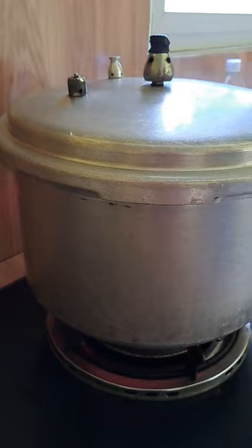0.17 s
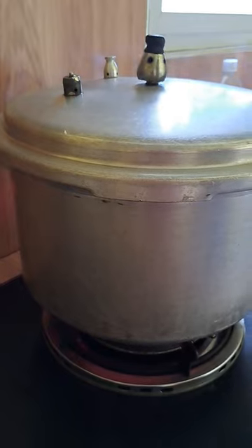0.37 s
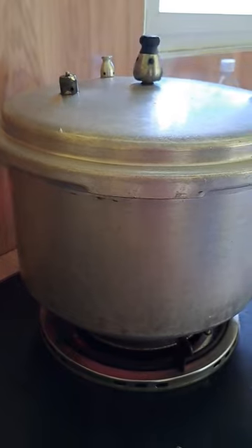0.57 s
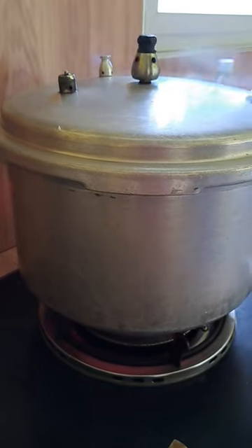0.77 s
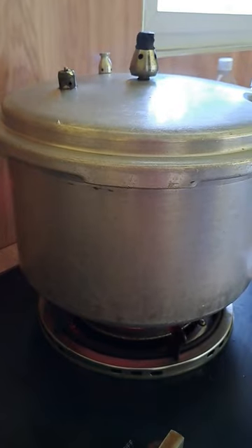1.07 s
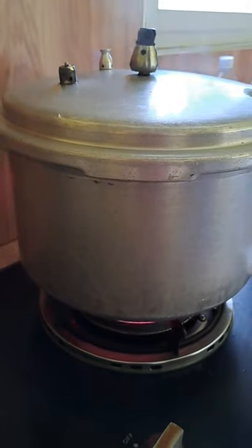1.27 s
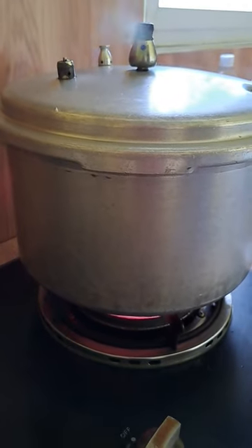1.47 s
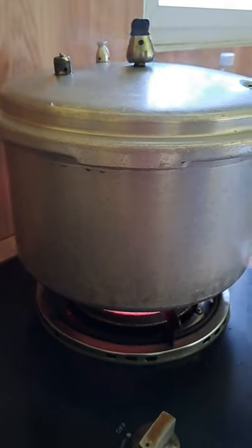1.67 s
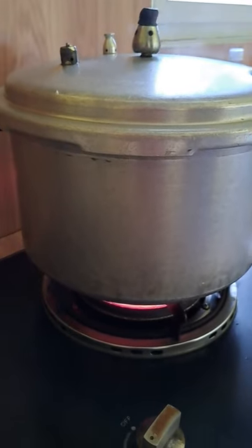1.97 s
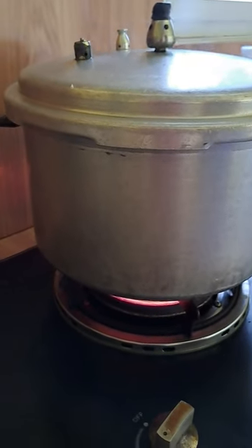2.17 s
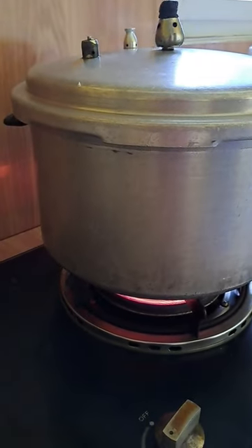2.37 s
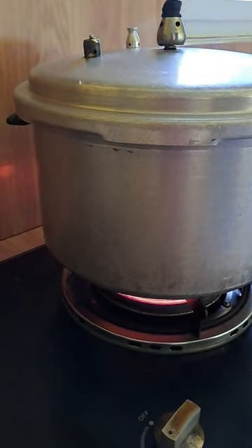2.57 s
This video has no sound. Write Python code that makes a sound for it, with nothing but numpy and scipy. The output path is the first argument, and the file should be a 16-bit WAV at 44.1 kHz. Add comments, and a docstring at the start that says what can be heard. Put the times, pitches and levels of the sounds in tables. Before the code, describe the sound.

Steam hisses loudly and continuously from a pressure cooker's rocking weight, surging in fast irregular pulses with fine spray and short spurts, over a very faint stove hum, heard close in stereo in a small kitchen.

```python
"""A pressure cooker vents on a gas ring in a small kitchen.
From the start, turbulent noise with a fine spray of droplets surges in bright hiss past the rocking weight.
Lid and walls scatter the swinging jets, resonant noise rings the lid, and the stove hums faintly below.
Soon short spurts of noise, about four a second, ring the two resonances of the vent."""
import sys
import numpy as np
from scipy import signal
from scipy.fft import rfft, irfft, next_fast_len
from scipy.io import wavfile

SR = 44100
rng = np.random.default_rng(int(sys.argv[2]) if len(sys.argv) > 2 else 0)


def file_out(sig):
    """Save sig as 16-bit WAV at sys.argv[1]."""
    # one column per channel
    cols = np.atleast_2d(sig).T
    # limit, then scale
    lim = np.clip(cols, -1, 1)
    pcm = np.round(lim * 32767).astype(np.int16)
    wavfile.write(sys.argv[1], SR, pcm)


N = 120393

# Steam flow past the rocking weight, before each register scales its swings: start_s, level_db
STEAM_FLOW = [(0.0, -21.5), (0.06, -23), (0.09, -26), (0.21, -23.5), (0.27, -21.5), (0.315, -22),
              (0.36, -21), (0.48, -25.5), (0.51, -21.5), (0.555, -19.5), (0.585, -19), (0.618, -19),
              (0.705, -26), (0.735, -25), (0.765, -17.5), (0.84, -22.5), (0.885, -20), (0.915, -23),
              (0.96, -22.5), (0.99, -25), (1.005, -27), (1.035, -24.5), (1.095, -17), (1.125, -23.5),
              (1.19, -22.3), (1.23, -28.8), (1.26, -28), (1.33, -17.5), (1.355, -17.5), (1.395, -25),
              (1.44, -22.5), (1.5, -28), (1.575, -20.5), (1.65, -22.5), (1.725, -27.5), (1.785, -20),
              (1.83, -20.5), (1.86, -21), (1.875, -20.5), (1.935, -28), (1.965, -27), (2.025, -19),
              (2.055, -17), (2.1, -25), (2.115, -26.5), (2.16, -21.5), (2.22, -25), (2.265, -23.5),
              (2.28, -19), (2.32, -21.5), (2.365, -19.5), (2.43, -29.5), (2.49, -20), (2.535, -17.5),
              (2.565, -21), (2.595, -20), (2.67, -26.5), (2.725, -24.5)]
# Low rush against the hiss; only departures from its mean count, in part: start_s, level_db
LOW_RUSH = [(0.0, 1), (0.09, 1.5), (0.18, -2), (0.39, 1.5), (0.525, -2.5), (0.57, 4), (0.705, -0.3),
            (0.78, -4.5), (0.84, 0.6), (1.11, -3.5), (1.125, 4.5), (1.2, -0.5), (1.71, -3), (1.755, -3),
            (1.935, 1), (1.98, -5), (2.07, -4), (2.1, 1), (2.145, -3), (2.46, -2.9), (2.53, -2.2),
            (2.61, 1.5), (2.725, -3.5)]
# Colour of the jets, shape only: frequency_hz, density_db (relative, per Hz)
JET_COLOUR = [(300, -20), (700, -24), (1050, -19), (1500, -18), (2000, -15), (2650, -11.5), (3200, -8.5),
              (3650, -9), (4500, -5), (6200, -3.5), (7000, -0.3), (7800, 2.5), (8500, -0.9), (9600, -5.5),
              (11300, -3), (12300, 1.1), (13300, 0), (15400, -0.7)]
# How strongly each register follows the flow: frequency_hz, follow_db_per_db
FLOW_RESPONSE = [(500, 0.9), (2000, 0.64), (4500, 1.12), (7800, 0.78), (10000, 1.42), (14000, 0.87)]
# Stereo tilt of the steam: frequency_hz, left_minus_right_db
STEREO_BALANCE = [(1000, 0), (3200, -0.6), (5600, -2), (7000, -1), (8000, -1.5), (9400, 5), (10300, 6),
                  (12300, 9), (13300, -7.5), (14500, 10)]
# Swing of the jets as the weight turns, about its mean: start_s, left_minus_right_db
JET_SWING = [(0.0, 3), (0.105, 1.5), (0.225, 3.5), (0.45, 1), (0.51, 3.5), (0.705, 0.5), (0.75, 2.5),
             (1.395, 1.5), (1.71, 2), (1.74, 3.5), (1.905, 0), (2.01, 4), (2.1, 1), (2.25, 3.8), (2.43, 1),
             (2.46, 3), (2.565, 0.1), (2.725, 3)]
# Direct sound over scattered sound: frequency_hz, ratio_db
DIRECT_RATIO = [(400, -2), (1600, 2), (2000, -15), (2550, 5), (3200, -3), (4400, -5.5), (7400, -3.5),
                (12000, -14)]
# Ringing of the lid: pitch_hz, half_width_hz, level_db (against the hiss)
LID_RINGS = [(2862, 9.9, -30), (5950, 18, -44), (7000, 28, -21)]
# Flame noise of the burner, shape only: frequency_hz, density_db (relative, per Hz)
FLAME_COLOUR = [(20, -3), (55, 2), (80, -2), (120, -2), (220, 6.5), (330, -2.5), (450, 3), (650, -8.5),
                (1500, 0.5), (4000, -31)]
# Low drone of the burner: pitch_hz, half_width_hz, level_db (rms)
BURNER_DRONE = [(118, 9.1, -69), (179.2, 1.6, -72.5), (229, 6, -64.5), (296, 6.6, -72.5),
                (364.7, 2.9, -70.5)]
# Tones of the stove: pitch_hz, level_db (rms before waver), waver_db (signed spread)
STOVE_HUM = [(152, -63, 1.4), (207, -72, 2.5), (213.3, -65.5, 2), (472.7, -66.5, -0.1)]
# Low and high resonance of the vent: pitch_hz, half_width_hz
VENT_RESONANCES = [(3400, 560), (7700, 970)]
# Spurts as the weight lifts: peak_s, low_ring_db, high_ring_db
WEIGHT_SPURTS = [(0.367, -47, -30), (0.555, -47, -22.5), (0.612, -36, -22), (1.09, -43, -26),
                 (1.334, -40, -21), (1.582, -38, -31), (1.815, -35.5, -30), (2.048, -39, -20),
                 (2.29, -42, -27), (2.53, -33, -31)]

CUTOFF_HZ = 15500
# Steam: _DB is a level or the spread of a drift, _HZ how fast it drifts
HISS_DB, FLUTTER_DB, FLUTTER_HZ, PATCHY_DB, PATCHY_HZ = -0.55, 0.09, 60, 1.1, 10
SPUTTER_DB, SPUTTER_HZ = 2.27, 28  # wet steam makes the low rush uneven
RUSH_BELOW_HZ, RUSH_SHARE = 4800, 0.91
SPRAY_PER_S, SPRAY_DB, SPRAY_SPREAD_DB = 510, -10, 3.5
# Space around the jets
RIGHT_LAG_S, SCATTER_T60_S, SPOT_OVERLAP = 0.0002077, 0.078, 0.77
WALL_ECHO_S, WALL_ECHO_DB = 0.001237, -19  # heard on the left
BLUR_SHARE, BLUR_ABOVE_HZ = 0.64, 6900
ROOM_DB, ROOM_T60_S = -12.5, 0.2
# Stove: side levels are relative to the middle
FLAME_DB, FLAME_SIDE_DB, DRONE_SIDE_DB = -58.5, -5.5, -25
FLAME_FLICKER_DB, FLAME_FLICKER_HZ = 1.5, 8.1
HUM_WAVER_RAD, HUM_WAVER_HZ = 0.11, 6.3
SPURT_S = 0.018  # from peak to 1/e


def from_db(db):
    """Decibels to gain."""
    return 10 ** (np.asarray(db) / 20)


def rms_one(x):
    """Scale to unit power."""
    return x / np.sqrt(np.mean(x ** 2) + 1e-20)


def in_time(rows):
    """Draw the last column of a curve at every sample."""
    rows = np.array(rows)
    return np.interp(np.arange(N) / SR, rows[:, 0], rows[:, -1])


def at_hz(points, hz):
    """Read a table on a log-frequency axis."""
    points = np.array(points)
    return np.interp(np.log(hz + 1e-6), np.log(points[:, 0]), points[:, 1])


def filtered(x, response):
    """Apply a gain given as a function of frequency."""
    size = next_fast_len(N + SR // 4)
    hz = np.arange(size // 2 + 1) * SR / size
    return irfft(rfft(x, size) * response(hz), size)[..., :N]


def drift(hz):
    """Slow random movement with spread 1."""
    return rms_one(filtered(rng.standard_normal(N), lambda f: 1 / (1 + (f / hz) ** 2)))


def resonant_noise(hz, half_width_hz):
    """Two unrelated noises shaped by one resonance."""
    noise = rng.standard_normal((2, N))
    return rms_one(filtered(noise, lambda f: 1 / (1 + ((f - hz) / half_width_hz) ** 2)))


def jet():
    """Turbulence as white noise, with droplets as random clicks of uneven size and sign."""
    size_db = SPRAY_SPREAD_DB * np.minimum(rng.exponential(1, N), 5)
    droplets = from_db(size_db) * rng.choice([-1, 1], N)
    spray = rms_one(droplets * (rng.random(N) < SPRAY_PER_S / SR))
    return rng.standard_normal(N) + from_db(SPRAY_DB) * spray


def echoes(x, t60):
    """Dense dying reflections, different at each ear, with unit power gain."""
    t = np.arange(SR // 8) / SR
    tail = rng.standard_normal((2, len(t))) * from_db(-60 * t / t60)
    tail /= np.sqrt(np.sum(tail ** 2, axis=1, keepdims=True))
    return signal.fftconvolve(np.atleast_2d(x), tail, axes=1)[:, :N]


def blurred(pair):
    """Swirling steam washes the fine colour out of the treble: fresh noise replaces part of it."""
    def share(f):
        return BLUR_SHARE * f ** 4 / (f ** 4 + BLUR_ABOVE_HZ ** 4)

    wash = filtered(rng.standard_normal((2, N)), lambda f: np.sqrt(share(f)))
    return wash + filtered(pair, lambda f: np.sqrt(1 - share(f)))


def moving_jets(count=11):
    """Jets heard directly, off the wall and scattered by lid and stove; the scatter changes slowly over time."""
    # Crossfade, at constant power, through spots that each have their own jet and echoes
    place = np.linspace(0, count - 1, N)
    weights = np.array([np.exp(-((place - spot) / SPOT_OVERLAP) ** 2) for spot in range(count)])
    weights /= np.sqrt(np.sum(weights ** 2, axis=0))
    scattered = blurred(sum(weight * echoes(jet(), SCATTER_T60_S) for weight in weights))

    def late(f, seconds):
        return np.exp(-2j * np.pi * f * seconds)

    def direct_paths(f):
        left = 1 + from_db(WALL_ECHO_DB) * late(f, WALL_ECHO_S)
        right = late(f, RIGHT_LAG_S)
        return from_db(at_hz(DIRECT_RATIO, f)) * np.array([left, right])

    direct = filtered(jet(), direct_paths)
    # Level out the power that the direct share adds
    return filtered(direct + scattered, lambda f: 1 / np.hypot(1, from_db(at_hz(DIRECT_RATIO, f))))


def lingering(gain):
    """Level of the room's wash, whose power fills up and dies away behind the source."""
    keep = from_db(-120 / (ROOM_T60_S * SR))  # power kept per sample
    power, _ = signal.lfilter([1 - keep], [1, -keep], gain ** 2, zi=[gain[0] ** 2])
    return np.sqrt(power)


def hiss(surge_db):
    """Jets and room wash in overlapping bands; each swells with the flow and flickers a little by itself."""
    def colour(f):
        low_cut = f ** 2 / (f ** 2 + 300 ** 2)
        return from_db(at_hz(JET_COLOUR, f)) * (f < CUTOFF_HZ) * low_cut

    jets = rms_one(filtered(moving_jets(), colour))
    diffuse = rms_one(filtered(rng.standard_normal((2, N)), colour))
    rush_db = in_time(LOW_RUSH)
    rush_db = rush_db - rush_db.mean()
    out = 0
    centres = np.geomspace(500, 14500, num=12)
    for hz, share in zip(centres, np.eye(len(centres))):
        # Triangular band: full at its own centre, silent at the others
        band = np.c_[centres, share]
        near, far = filtered(np.array([jets, diffuse]), lambda f: at_hz(band, f))
        low = 1 / (1 + (hz / RUSH_BELOW_HZ) ** 4)
        level_db = at_hz(FLOW_RESPONSE, hz) * surge_db + RUSH_SHARE * low * rush_db
        gain = from_db(level_db + PATCHY_DB * drift(PATCHY_HZ))
        sputter = from_db(SPUTTER_DB * low * drift(SPUTTER_HZ))
        out = out + near * gain * sputter + far * from_db(ROOM_DB) * lingering(gain)
    return out


def lid(surge_db):
    """The jets keep the lid ringing faintly: narrow noise bands that swell with the flow."""
    rings = sum(from_db(db) * resonant_noise(hz, width) for hz, width, db in LID_RINGS)
    return from_db(surge_db) * rings


def widen(pair, side_db):
    """Mid and side to left and right."""
    return pair[0] + from_db(side_db) * pair[1] * np.array([[1], [-1]])


def stove():
    """Soft flickering flame noise, a low drone of resonant noise and a hum of wavering sines."""
    t = np.arange(N) / SR
    flame = rms_one(filtered(rng.standard_normal((2, N)), lambda f: from_db(at_hz(FLAME_COLOUR, f))))
    flame = flame * from_db(FLAME_DB + FLAME_FLICKER_DB * drift(FLAME_FLICKER_HZ))
    drone = sum(from_db(db) * resonant_noise(hz, width) for hz, width, db in BURNER_DRONE)
    hum = 0
    for hz, db, waver_db in STOVE_HUM:
        level = from_db(db + waver_db * drift(HUM_WAVER_HZ)) * np.sqrt(2)  # rms to peak
        phase = 2 * np.pi * hz * t + HUM_WAVER_RAD * drift(HUM_WAVER_HZ)
        hum = hum + level * np.sin(phase)
    return widen(flame, FLAME_SIDE_DB) + widen(drone, DRONE_SIDE_DB) + hum


def vent():
    """Each lift of the weight lets out a short spurt that rings the hollow of the valve."""
    t = np.arange(N) / SR
    peaks_s, *levels_db = np.transpose(WEIGHT_SPURTS)
    shapes = np.exp(-((t - peaks_s[:, None]) / SPURT_S) ** 2)
    out = 0
    for (hz, width), db in zip(VENT_RESONANCES, levels_db):
        out = out + from_db(db) @ shapes * resonant_noise(hz, width)
    return out


def scene():
    """Steam in the kitchen, swinging left and right, over the stove."""
    flow_db, swing_db = in_time(STEAM_FLOW), in_time(JET_SWING)
    surge_db = flow_db - flow_db.mean()
    sides = np.array([[.5], [-.5]])  # half of each difference to each ear
    steam_db = HISS_DB + flow_db.mean() + FLUTTER_DB * drift(FLUTTER_HZ)
    steam = (hiss(surge_db) + lid(surge_db)) * from_db(steam_db) + vent()
    steam = steam * from_db(sides * (swing_db - swing_db.mean()))
    return filtered(steam, lambda f: from_db(sides * at_hz(STEREO_BALANCE, f))) + stove()


def record(dry):
    """Cut the top steeply."""
    return filtered(dry, lambda f: 1 / np.sqrt(1 + (f / CUTOFF_HZ) ** 400))


dry = scene()
out = record(dry)
file_out(out)
```